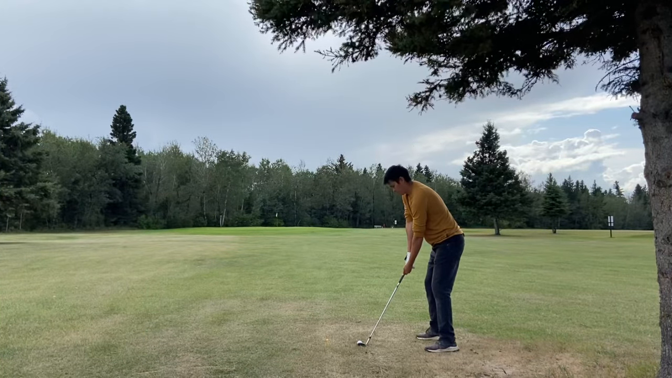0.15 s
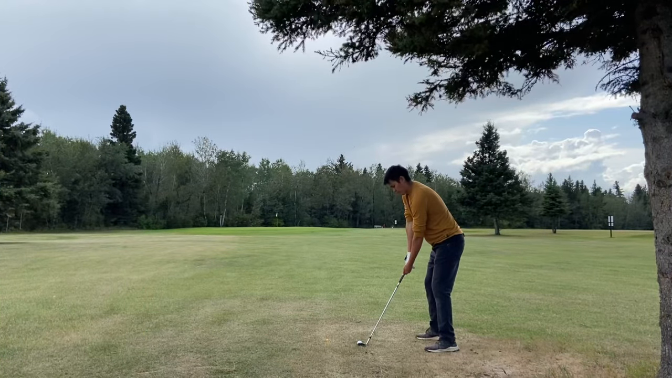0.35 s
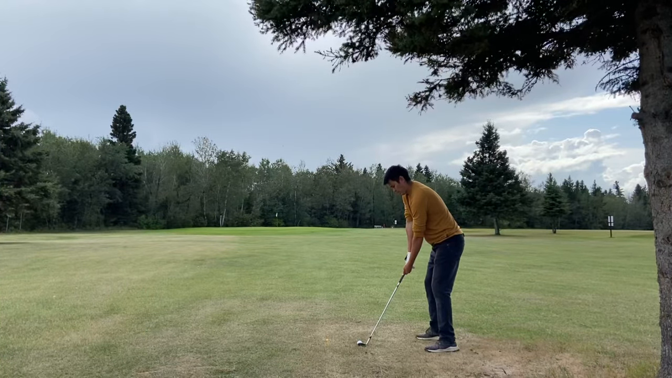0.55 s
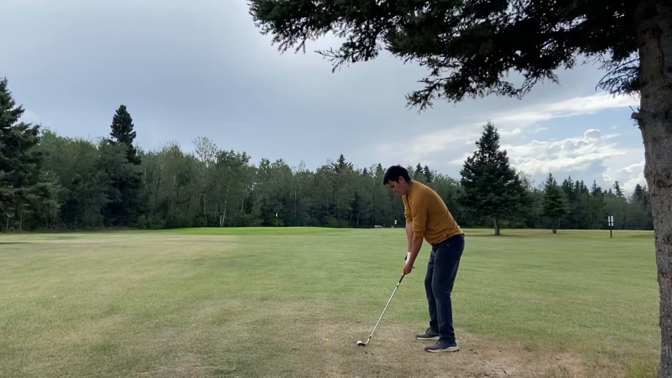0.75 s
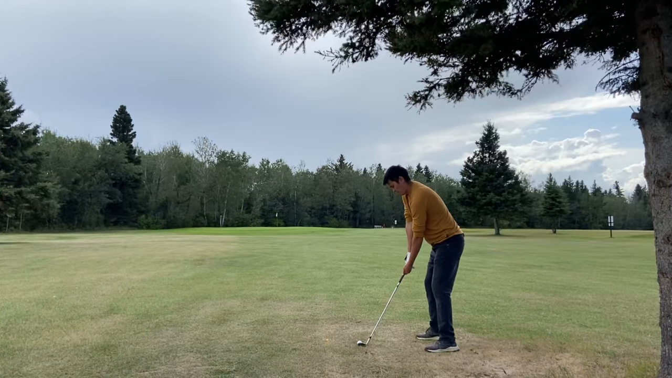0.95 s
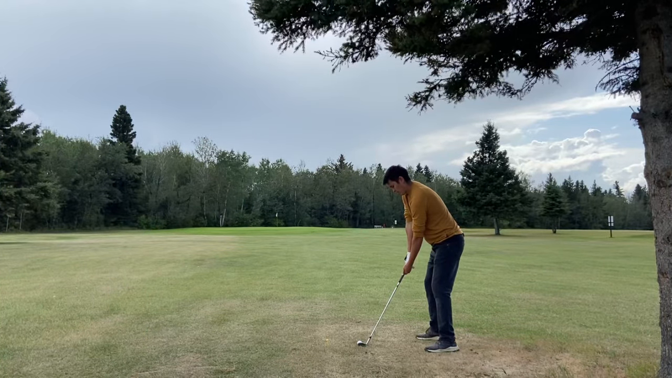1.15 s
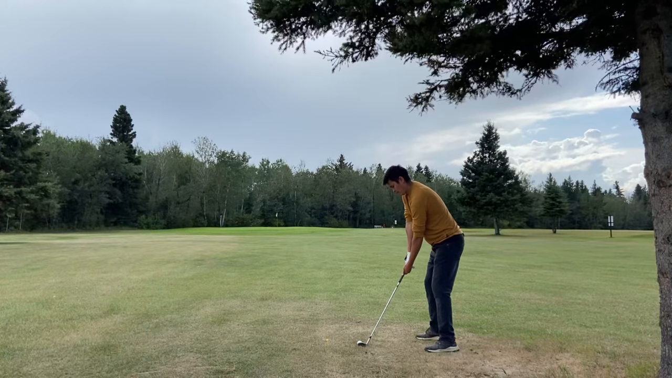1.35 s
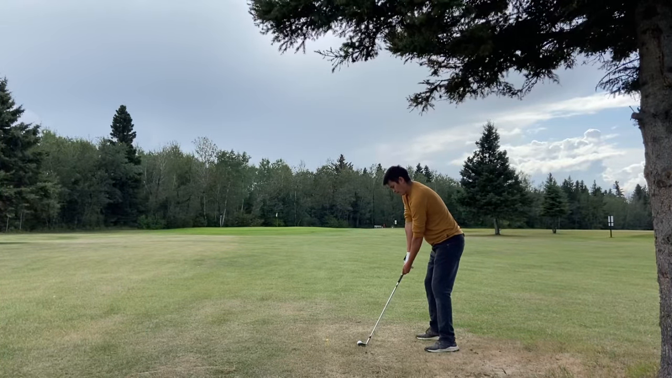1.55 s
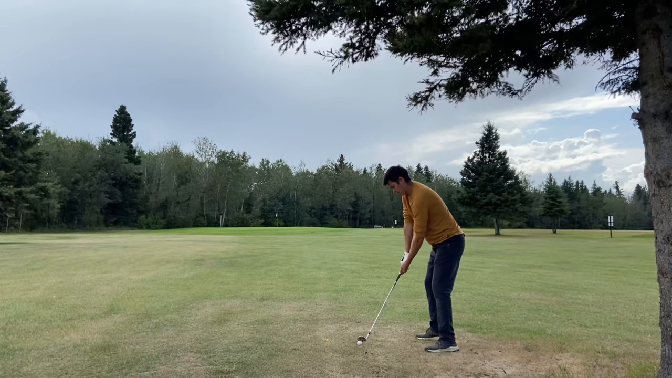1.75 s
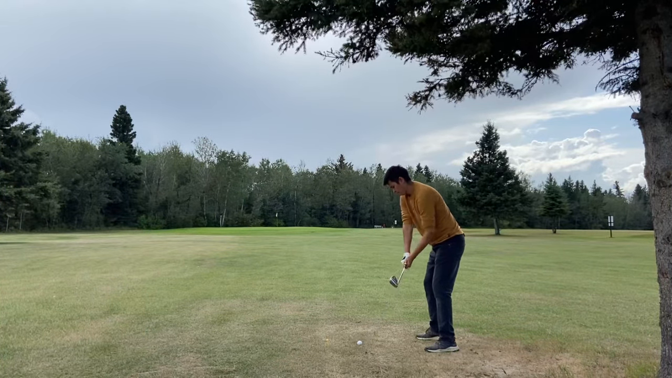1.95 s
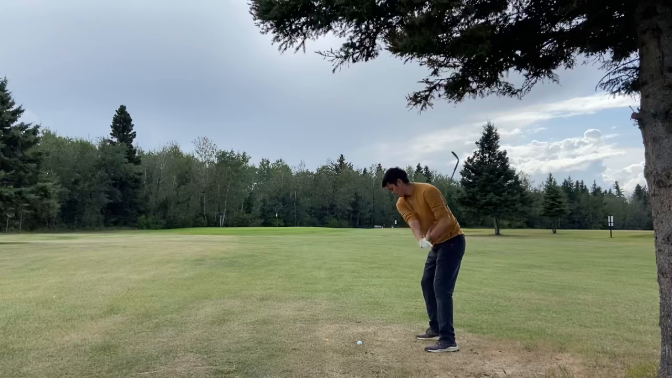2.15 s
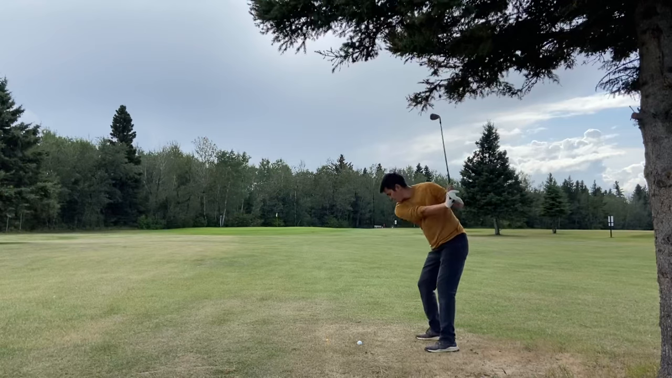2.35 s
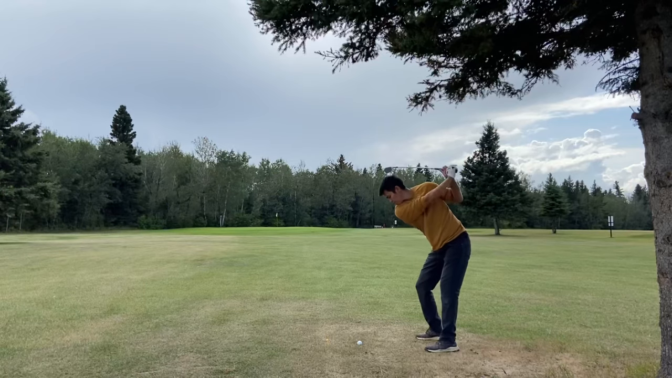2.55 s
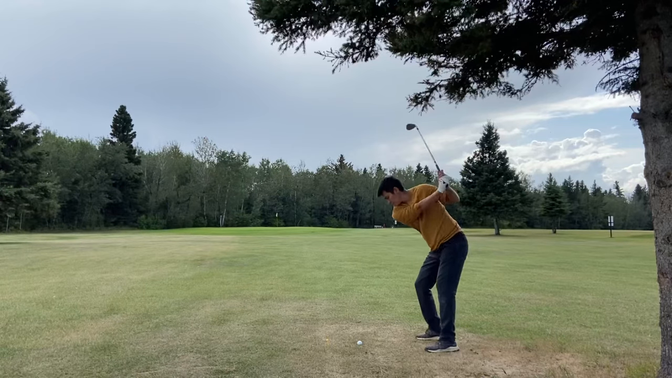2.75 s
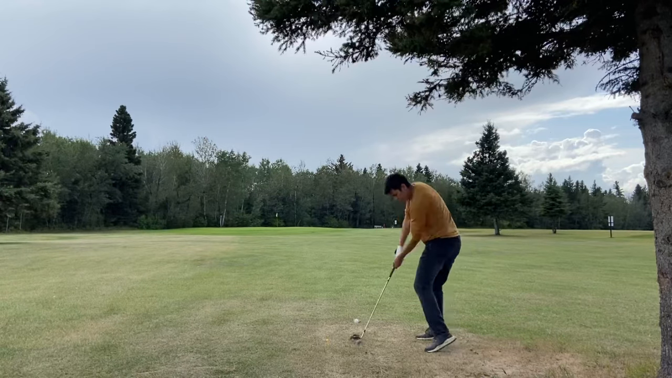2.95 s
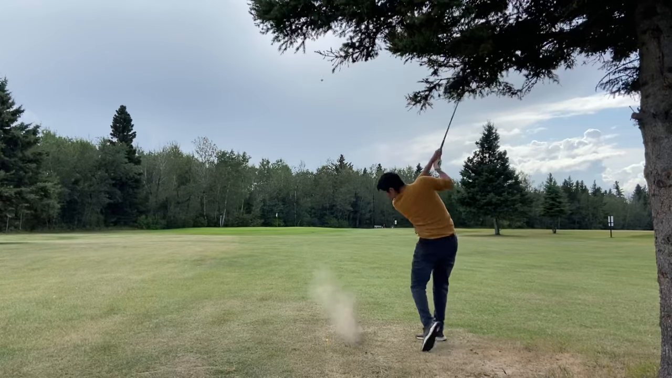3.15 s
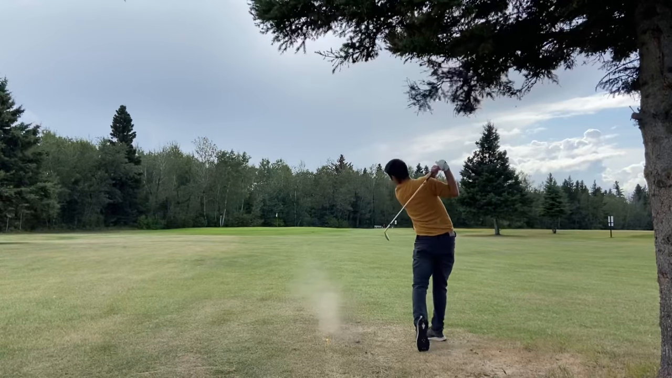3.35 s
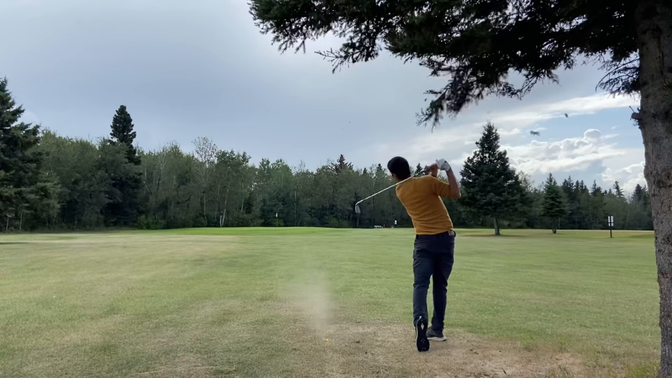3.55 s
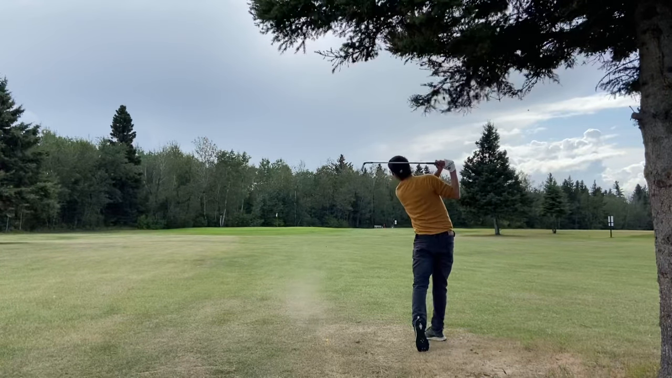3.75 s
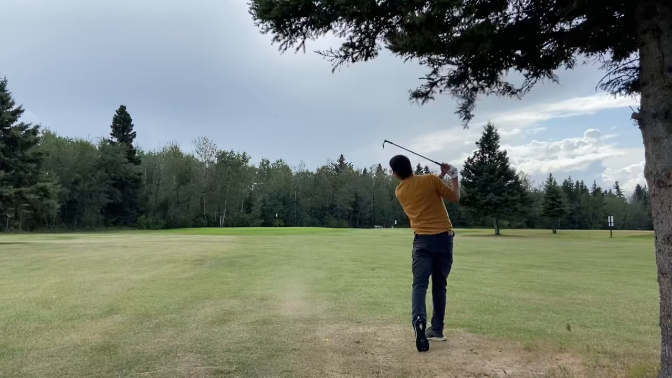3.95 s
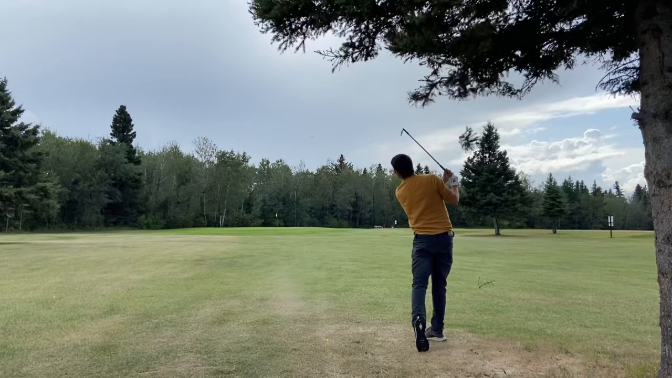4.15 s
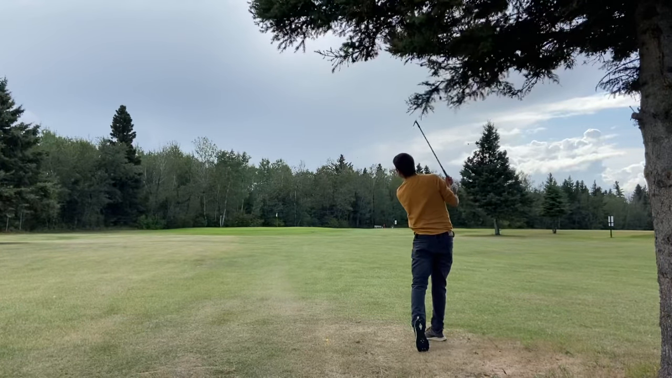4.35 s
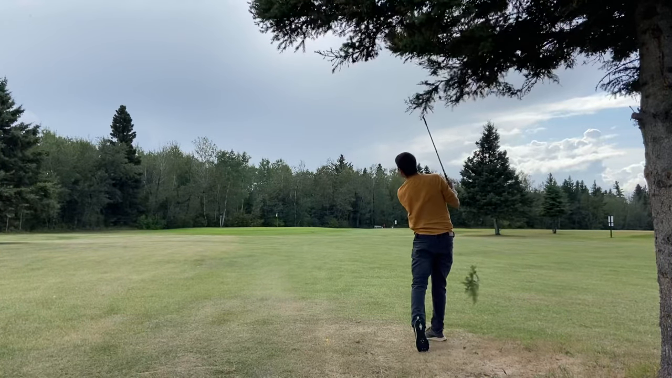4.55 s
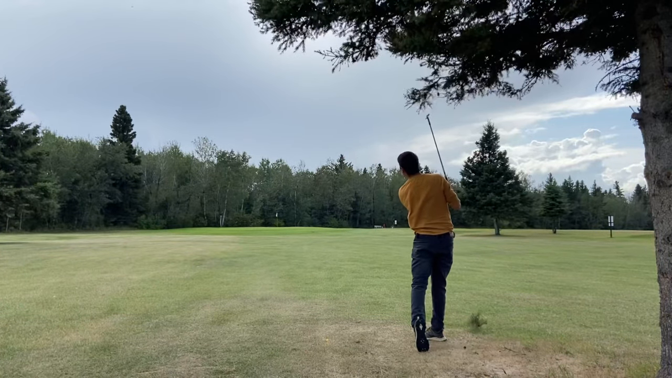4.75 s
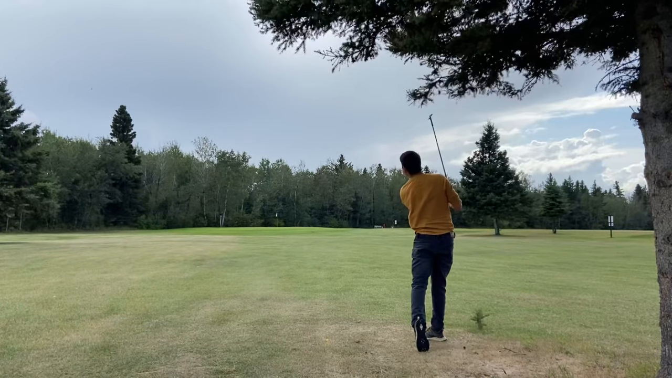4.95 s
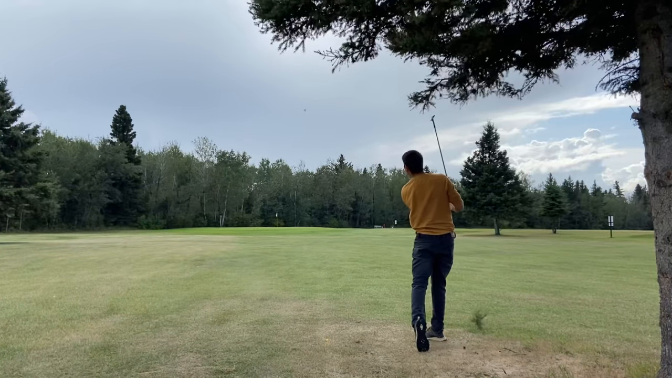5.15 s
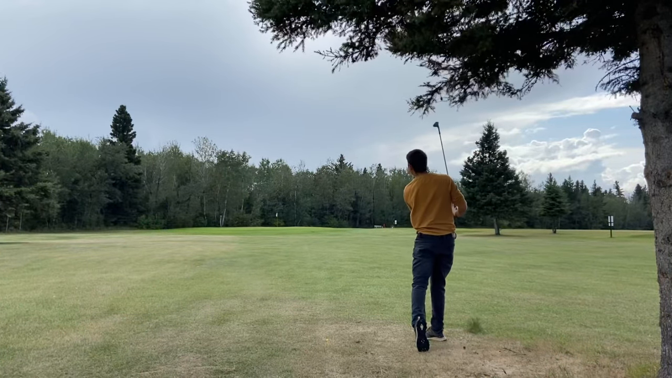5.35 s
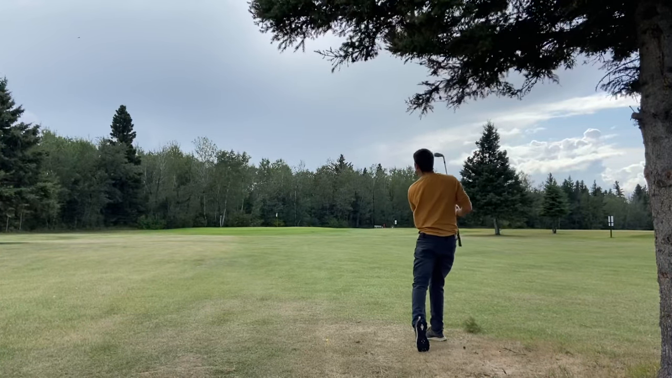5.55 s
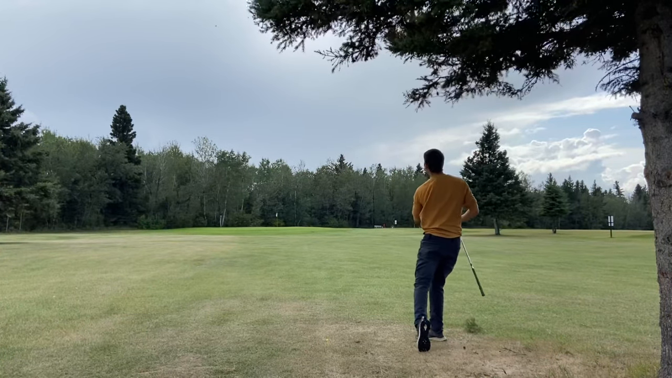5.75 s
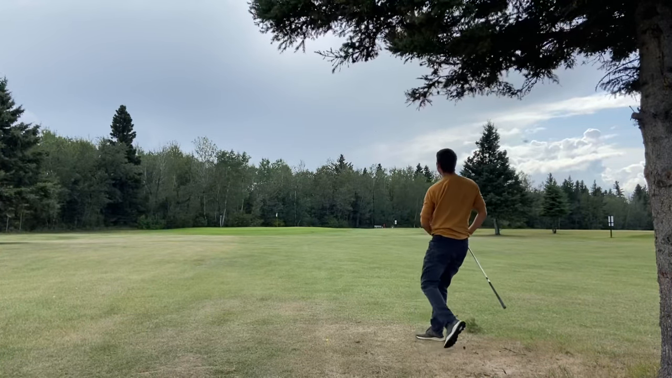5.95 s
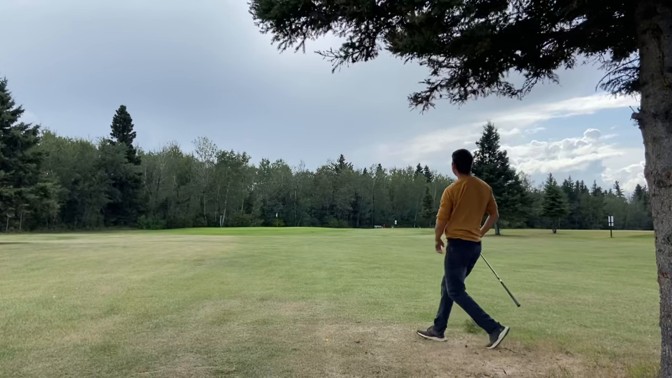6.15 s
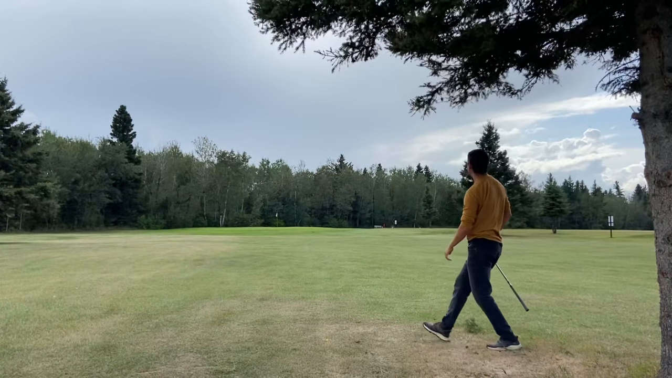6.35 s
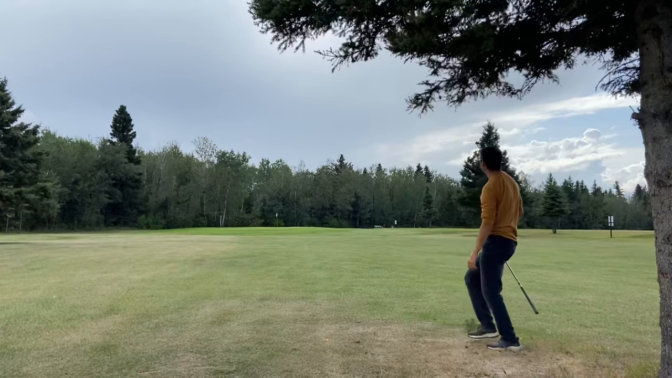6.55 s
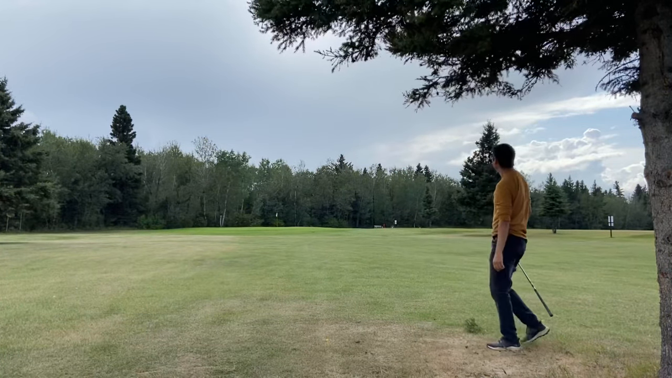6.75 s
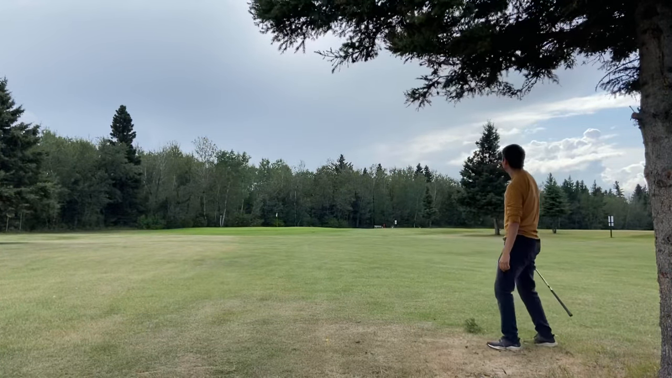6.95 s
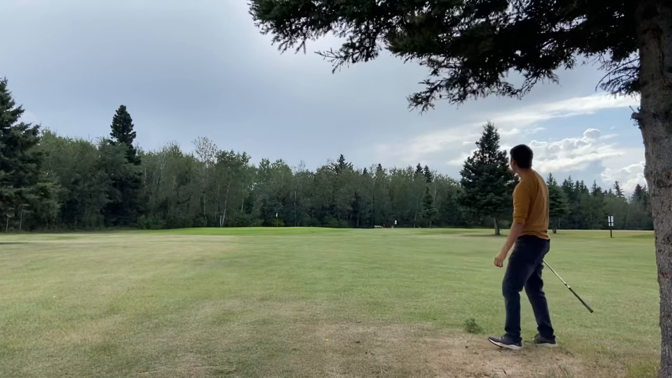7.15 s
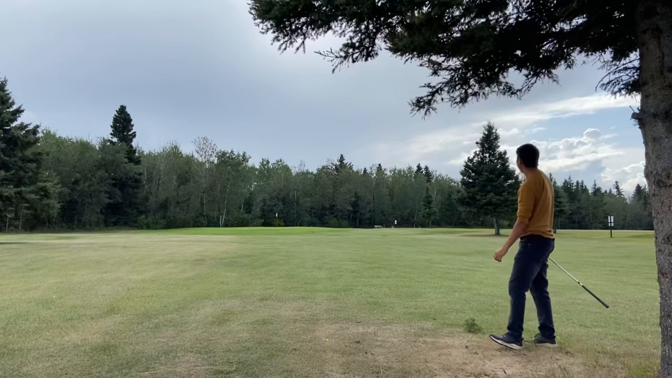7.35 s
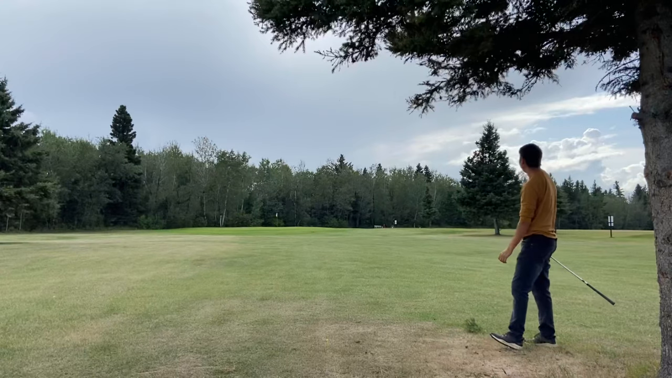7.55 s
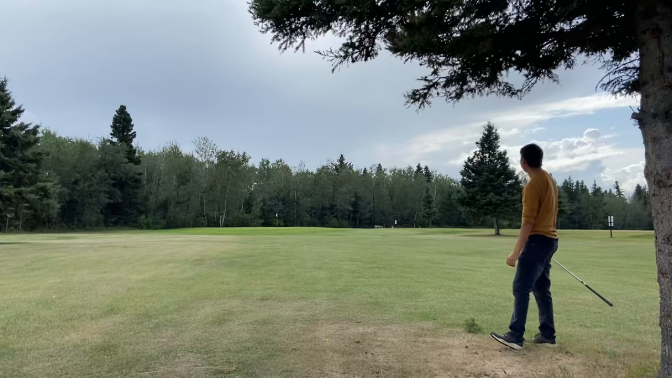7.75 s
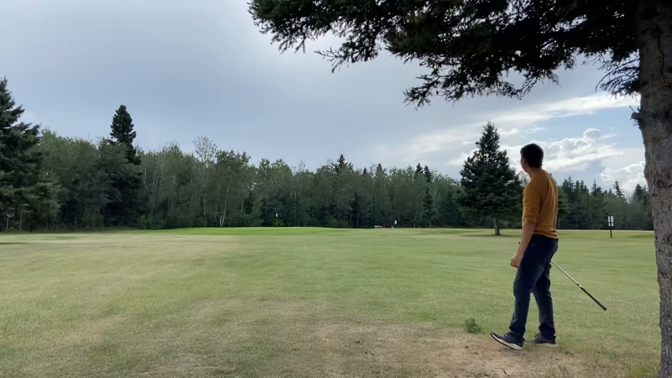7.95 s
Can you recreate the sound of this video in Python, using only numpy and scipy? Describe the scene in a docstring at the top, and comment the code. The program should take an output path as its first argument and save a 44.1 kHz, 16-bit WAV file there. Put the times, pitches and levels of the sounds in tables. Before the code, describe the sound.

Low uneven wind thumps a phone microphone outdoors; a golf swing whooshes into one sharp dry crack, then the ball snaps through conifer twigs.

```python
"""Golf swing on a breezy course

A golfer swings an iron: noise bands make the swish, and damped tones and crackles make the blow in dry turf.
The ball clips a spruce bough: ringing twigs, crunching noise and ticking needles. Puffs of noise are shoes and
club brushing the grass before the swing, and shoes, club and a falling twig afterwards. Shaped noise makes the
wind in the trees and on the two close ports of a phone microphone, where falling tones thump; a far machine hums."""
import sys
import numpy as np
from scipy import signal
from scipy.fft import rfft, irfft, next_fast_len
from scipy.io import wavfile
from scipy.ndimage import uniform_filter1d, map_coordinates

SR = 44100
rng = np.random.default_rng(int(sys.argv[2]) if len(sys.argv) > 2 else 0)


def transcribe(signal):
    """Save signal, clipped to [-1, 1], as a 16-bit WAV file at the path in sys.argv[1]."""
    frames = np.atleast_2d(signal).T
    limited = np.clip(frames, -1, 1)
    pcm = np.round(limited * 32767).astype(np.int16)
    wavfile.write(sys.argv[1], SR, pcm)


N = 353152  # samples, about 8 seconds

# In every noise colour table, level_db_per_hz is relative: the noise is scaled to rms 1 afterwards.
# In every table of bursts or ringing tones, level_db is taken before the rise, and t60_s is the time to fall 60 dB.

STRIKE_S = 2.9415  # the face meets the ball
RING_DB, CRACK_DB, CRACK_T60_S = -2, -4, 0.009
# Ringing tones of club face and ball: pitch_hz, level_db (before RING_DB), t60_s
CLUB_TONES = [(295, -15.5, 0.075), (476, -5, 0.035), (700, 2.5, 0.014), (1075, 0.5, 0.016),
              (1340, 0, 0.024), (1694, 3, 0.018), (2157, -5, 0.02), (2400, -18, 0.027), (2545, -11, 0.025),
              (2750, -7, 0.026), (3320, -18, 0.016), (3555, -4.5, 0.021), (3880, -15, 0.023),
              (4020, -21, 0.036), (4345, -8.5, 0.022), (4700, -13, 0.022), (5140, -15.5, .015),
              (5860, -10.5, 0.016), (6600, -11.5, 0.01), (6900, -10, .017), (7330, -14, 0.017),
              (8450, -19.5, 0.015), (10200, -17.5, 0.022), (14500, -19, .018)]
# Thuds of the club head into the ground: start_s, peak_db, pitch_hz
GROUND_THUDS = [(2.9415, -19, 160), (2.945, -15.5, 303), (2.9462, -21.5, 155), (2.948, -30.5, 75)]
# Noise colour of the crack: pitch_hz, level_db_per_hz
CRACK_COLOUR = [(300, -13), (1400, 7.5), (4000, -6.5), (9000, -9.5), (15500, -13)]
# Scrapes of the sole through the turf: start_s, level_db, t60_s
TURF_SCRAPES = [(2.939, -14, 0.022), (2.945, -19.5, 0.043), (2.953, -15.5, 0.039)]
# Noise colour of the turf: pitch_hz, level_db_per_hz
TURF_COLOUR = [(100, 2), (280, 11), (600, -11), (900, -7), (1400, 2.5), (1900, 2), (2700, 1), (3100, -6.5),
               (3950, -1), (4700, -3.5), (5600, -10), (6400, -5), (10000, -8.5), (15500, -17.5)]
# Sprays of dry soil off the face: start_s, level_db, t60_s
SOIL_SPRAYS = [(2.951, -35, 0.057), (2.9575, -32.5, 0.05), (2.966, -37.5, 0.05), (2.975, -41, .04)]
# Noise colour of the soil grains: pitch_hz, level_db_per_hz
SOIL_COLOUR = [(400, -5.5), (1400, -2), (2200, -4), (3100, -3.5), (4000, 8.5), (5400, -7), (6700, -6),
               (10000, -8), (15500, -14)]


def strike():
    """The sole grazes the grass, the face cracks and rings against the ball, then thuds and sprays dry soil."""
    blow = np.zeros(N)
    add(blow, STRIKE_S, amp(RING_DB) * ring(CLUB_TONES, rise_cycles=0.89))
    for start_s, peak_db, pitch_hz in GROUND_THUDS:
        add(blow, start_s, amp(peak_db) * push(pitch_hz, cycles=1.03))
    crack = bursts([(STRIKE_S, CRACK_DB, CRACK_T60_S)], rise_s=0.0001) * rush(CRACK_COLOUR)
    scrape = bursts(TURF_SCRAPES, rise_s=0.0021) * crackle(TURF_COLOUR, rate=2200, spread_db=4)
    spray = bursts(SOIL_SPRAYS, rise_s=0.0008) * crackle(SOIL_COLOUR, rate=1600, spread_db=3.5)
    return (blow + crack + scrape + spray) * amp([[0.2], [-0.2]])  # slightly left


def push(pitch_hz, cycles):
    """A soft pressure swing whose outline swells to 1 over some cycles, then dies away."""
    turns = pitch_hz * np.arange(SR // 4) / SR
    return swell(turns / cycles) * np.sin(2 * np.pi * turns)


# Speed of the shaft, given as the pitch of its vortices: time_s, pitch_hz
SHAFT_SPEED = [(2.6, 99.6), (2.82, 310), (2.872, 373), (2.895, 456), (2.918, 493), (2.94, 480), (3.0, 413),
               (3.075, 418), (3.2, 199), (3.35, 99.6)]
# Noise colour of the air torn by the club head: pitch_hz, level_db_per_hz
AIR_COLOUR = [(200, -1.5), (700, 6), (1300, -0.5), (2300, 0), (5000, -10.5), (9000, -16), (15000, -22)]
WHISTLE_DB, WHISTLE_GROWS = -39.5, 5  # level at top speed; power of speed
AIR_DB, AIR_GROWS = -41, 6.8  # level at top speed; power of speed
WHISTLE_WIDTH_HZ = 90  # random knots a second: more of them scatter the pitch more widely
FOLLOW_THROUGH_DB = -5.5  # the whistle drops once the club is past the ball


def swish():
    """The shaft sheds ragged vortices, a narrow noise band, and the head tears the air; both grow with speed."""
    pitch_hz, = curves(SHAFT_SPEED)
    speed_db = 20 * np.log10(pitch_hz / pitch_hz.max())
    past_ball = np.arange(N) / SR > STRIKE_S
    phase = 2 * np.pi * np.cumsum(pitch_hz) / SR
    # two random curves make the tone waver in strength and phase
    sine_part = wobble(WHISTLE_WIDTH_HZ) * np.sin(phase)
    cosine_part = wobble(WHISTLE_WIDTH_HZ) * np.cos(phase)
    vortices = unit(sine_part + cosine_part)
    whistle = amp(WHISTLE_DB + WHISTLE_GROWS * speed_db) * vortices
    air = amp(AIR_DB + AIR_GROWS * speed_db) * rush(AIR_COLOUR)
    return whistle * amp(FOLLOW_THROUGH_DB * past_ball) + air


# Snaps as the ball breaks through the bough; knock and crunch are relative to the snap:
# start_s, level_db, t60_s, knock_db, crunch_db, pitch_ratio
TWIG_SNAPS = [(3.1159, -19.5, 0.011, -8.5, -14, 1.35), (3.1178, -16.5, 0.017, -1, -9, 1),
              (3.1202, -21, 0.02, -3, -9, 1.4), (3.128, -33, 0.028, -11, -9, .8),
              (3.132, -32, 0.028, -16, -7, 1.55), (3.1355, -42, 0.022, -16, 7, 2),
              (3.142, -41, 0.039, -16, -6, 1.8), (3.159, -39.5, 0.055, -16, -6, 1.7),
              (3.166, -38, 0.083, -17, -6, 1.6), (3.172, -40, 0.056, -17, -2, 2.1),
              (3.189, -39, 0.065, -18, -8, 2.3), (3.324, -46.5, 0.098, -17, -14, 2)]
# Ringing tones of the wood at pitch_ratio 1: pitch_hz, level_db (relative), t60_s
WOOD_TONES = [(150, -15.5, 0.097), (307, -13.5, 0.063), (683, -9.5, 0.04), (940, -8, 0.039),
              (1187, -4, 0.051), (1570, -4, 0.029), (2460, -11, 0.033), (2850, -16, .028),
              (3440, -17, .023), (3910, -15, 0.022), (4760, -17, 0.025), (4930, -12, .027)]
# Noise colour of splinters and needles: pitch_hz, level_db_per_hz
SPLINTER_COLOUR = [(300, -11), (800, -6), (1400, -9), (2600, -2.5), (4800, -2.5), (6000, -4.5), (9000, 4.5),
                   (12000, 0.5), (15000, 2), (16000, -11.5)]
# Noise colour of crushed twigs: pitch_hz, level_db_per_hz
TWIG_COLOUR = [(200, -12), (700, 0), (1250, -1), (2000, -2), (2600, -5), (4900, -4), (6000, -15),
               (15000, -32)]
SWEEP_DB, SWEEP_T60_S = -40, 0.38  # sprigs that whip against each other


def bough():
    """The ball knocks on the wood, then crushes and splinters twigs, each knock with its own pitch."""
    knocks = np.zeros(N)
    for start_s, level_db, _, knock_db, _, ratio in TWIG_SNAPS:
        # higher twigs also ring for a shorter time
        twig = [(hz * ratio, tone_db, t60_s / ratio) for hz, tone_db, t60_s in WOOD_TONES]
        add(knocks, start_s, amp(level_db + knock_db) * ring(twig, rise_cycles=0.4))
    splinters = bursts([row[:3] for row in TWIG_SNAPS], rise_s=0.00013) * rush(SPLINTER_COLOUR)
    crunch_rows = [(s, db + crunch_db, t60_s) for s, db, t60_s, _, crunch_db, _ in TWIG_SNAPS]
    crunch = bursts(crunch_rows, rise_s=0.00017) * crackle(TWIG_COLOUR, rate=2500, spread_db=2.5)
    sprigs = unit(amp(2.5 * wobble(220)) * crackle(TWIG_COLOUR, rate=1200, spread_db=3.5))
    sweep = bursts([(TWIG_SNAPS[0][0], SWEEP_DB, SWEEP_T60_S)], rise_s=0.0054) * sprigs
    return (knocks + crunch + sweep) * amp([[-0.3], [0.3]]) + splinters  # all but splinters slightly right


SHOWER_DB, SHOWER_T60_S = -34.5, 0.6  # needles shaken loose
TRICKLE_DB, TRICKLE_HOLD_S, TRICKLE_T60_S = -65, 0.83, 0.72  # the last ones sift down


def needles():
    """The first snap shakes out a clumpy shower of needles that thins to a trickle, holds and dies away."""
    start_s = TWIG_SNAPS[0][0]
    age_s = np.arange(N) / SR - start_s
    shower = bursts([(start_s, SHOWER_DB, SHOWER_T60_S)], rise_s=0.0028)
    after_hold_s = np.maximum(age_s - TRICKLE_HOLD_S, 0)
    trickle = (age_s > 0) * amp(TRICKLE_DB - 60 * after_hold_s / TRICKLE_T60_S)
    ticks = crackle(SPLINTER_COLOUR, rate=1500, spread_db=6) * amp(1.5 * wobble(150))
    return np.hypot(shower, trickle) * ticks


# Small brushes in the grass, of shoes and club before the swing and of shoes, club and falling twig afterwards:
# start_s, level_db, t60_s, rise_s
GRASS_BRUSHES = [(.88, -63, 0.25, .015), (1.65, -60, 0.043, .0014), (2.23, -55, 0.23, 0.057),
                 (4.002, -59, .06, .0014), (4.249, -51, .03, .0014), (4.256, -45.5, 0.039, 0.0008),
                 (4.265, -61, .5, .02), (4.624, -52, 0.39, 0.0083), (5.979, -52, 0.063, .0014),
                 (5.99, -61.5, 0.7, .0014), (6.73, -63, 0.44, .03)]
# Noise colour of the grass: pitch_hz, level_db_per_hz
GRASS_COLOUR = [(1500, -10), (5000, -6), (7200, 0), (12000, 0.5), (15000, -2), (16000, -5)]


def grass():
    """Each brush is a puff of dry noise, roughened by fast random level changes, sudden or swelling."""
    level = sum(bursts([(s, db, t60_s)], rise_s) for s, db, t60_s, rise_s in GRASS_BRUSHES)
    return level * unit(amp(3.2 * wobble(770)) * rush(GRASS_COLOUR))


# Rustles of clothes as the golfer settles and takes the club back: peak_s, peak_db
CLOTH_RUSTLES = [(.12, -60.5), (1.76, -56.5)]
# Noise colour of the cloth: pitch_hz, level_db_per_hz
CLOTH_COLOUR = [(500, 9), (2500, 0), (5000, -12), (7500, -12), (10000, -22), (15000, -30)]
RUSTLE_S = 0.09  # time from the peak until the level is down to 37 percent


def clothes():
    """Each rustle is cloth noise that swells and fades smoothly."""
    t = np.arange(N) / SR
    level = sum(amp(db) * np.exp(-((t - peak_s) / RUSTLE_S) ** 2) for peak_s, db in CLOTH_RUSTLES)
    return level * rush(CLOTH_COLOUR)


# Wind buffeting the microphone: time_s, level_db (before RUMBLE_DB and the lumps)
BUFFET_LEVEL = [(0.0, -40.5), (0.12, -36.5), (0.27, -41.5), (0.62, -43.5), (0.85, -44.5), (0.96, -50),
                (1.12, -44.5), (1.27, -49.5), (1.45, -39.5), (1.52, -36), (1.61, -45), (1.75, -50),
                (1.96, -46.5), (2.08, -42.5), (2.2, -40), (2.34, -35.5), (2.48, -40.5), (2.55, -51),
                (2.7, -48.5), (2.92, -51), (3.12, -39), (3.23, -39.5), (3.34, -43.5), (3.45, -42.5),
                (3.56, -41.5), (3.8, -40.5), (3.92, -45), (4.05, -43), (4.18, -39.5), (4.34, -42.5),
                (4.53, -43.5), (4.95, -42.5), (5.14, -43), (5.55, -39.5), (5.71, -45.5), (5.93, -47),
                (6.02, -43), (6.38, -39), (6.56, -37.5), (6.69, -33.5), (6.82, -41.5), (7.1, -43),
                (7.42, -47.5), (7.66, -45), (7.9, -40.5), (8.01, -38)]
# Noise colour of the rumble: pitch_hz, level_db_per_hz
RUMBLE_COLOUR = [(20, -27.5), (35, -6), (55, 3.5), (85, 1), (130, -4.5), (200, -10.5), (300, -14),
                 (450, -34), (700, -37.5), (1500, -91)]
# Strongest eddies that hit the microphone; pitch is taken at the peak, flutter is relative to peak_db:
# peak_s, peak_db, pitch_hz, flutter_db, flutter_t60_s
WIND_EDDIES = [(.041, -26.5, 149, -2.5, 0.085), (.087, -24.5, 130, -9, 0.097),
               (0.239, -29.5, 170, -6.5, 0.22), (.294, -31, 153, -3, 0.073), (0.415, -32, 112, -8, 0.087),
               (0.437, -27, 163, -20, 0.083), (.558, -23, 153, -11, 0.16), (.735, -35, 159, -11, 0.11),
               (1.328, -28.5, 89.5, -8.5, 0.14), (1.471, -32, 150, -6, 0.12),
               (1.504, -17, 98, -12.5, 0.078), (1.679, -28.5, 89, -14, .08),
               (2.263, -25.5, 151, -14, 0.083), (2.348, -25, 240, -10, .1), (2.361, -19, 161, -5, 0.12),
               (2.441, -46, 120, -13, .09), (2.615, -29.5, 110, -5.5, 0.29), (2.696, -23, 182, 0, 0.072),
               (3.014, -23, 70, -7, 0.094), (3.193, -25.5, 166, -5.5, 0.18), (3.235, -26, 129, -19, .1),
               (4.127, -37, 89, -12, 0.067), (4.218, -17.5, 128, -13, 0.084), (4.237, -18, 112, -12.5, 0.1),
               (4.43, -29, 85, -14, .08), (4.525, -26.5, 100, -17, .09), (4.559, -30.5, 189, 2, .06),
               (4.866, -28.5, 107, -7, 0.11), (4.9, -22, 80, -6, 0.14), (5.364, -33.5, 480, -11, 0.063),
               (5.393, -26, 257, 1, 0.078), (5.41, -15, 138, -18.5, 0.056), (5.451, -32.5, 450, -5, 0.092),
               (5.486, -35, 420, -2, 0.087), (5.5, -30.5, 123, -10, .08), (5.532, -21, 85.5, -20, .1),
               (5.611, -26, 104, -9, .13), (5.625, -27, 140, -13, .12), (5.781, -30, 83.5, -14, 0.081),
               (5.85, -30, 95, -13, .08), (6.479, -28.5, 100, -14, 0.092), (6.56, -20.5, 101, -18, .1),
               (6.652, -7, 79, -23, 0.17), (6.69, -26, 198, -1, 0.29), (6.714, -27, 170, -10, 0.12),
               (6.894, -27.5, 129, -12, 0.11), (7.263, -21, 89, -6.5, 0.11)]
# Noise colour of the flutter: pitch_hz, level_db_per_hz
FLUTTER_COLOUR = [(40, -20), (110, -1.5), (200, 0), (290, -5), (450, -17.5), (900, -56), (2500, -74)]
RUMBLE_DB = 3.5  # rumble over the buffet level
LUMP_DB, PORT_LUMP_DB = 1.34, 1.1  # size of the lumps at both ports together and at each alone
EDDY_LAG_CYCLES = 0.086  # an eddy's delay from port to port


def microphone_wind():
    """A lumpy rumble, with eddies that thump, slow down and flutter, each thump reaching one port first."""
    buffet_db, = curves(BUFFET_LEVEL)
    lumps_db = LUMP_DB * wobble(22) + PORT_LUMP_DB * np.array([wobble(30), wobble(30)])
    rumble = amp(buffet_db + RUMBLE_DB + lumps_db) * rush(RUMBLE_COLOUR)
    thumps, flutter = np.zeros((2, N)), np.zeros(N)
    lags = EDDY_LAG_CYCLES * rng.choice([-1, 1], len(WIND_EDDIES))  # random side first
    for (peak_s, peak_db, pitch_hz, flutter_db, t60_s), lag in zip(WIND_EDDIES, lags):
        start_s = peak_s - EDDY_CYCLES / pitch_hz
        half_lag_s = lag / pitch_hz / 2
        thump = amp(peak_db) * eddy(pitch_hz)
        add(thumps[0], start_s - half_lag_s, thump)
        add(thumps[1], start_s + half_lag_s, thump)
        add(flutter, start_s, amp(peak_db + flutter_db) * fade(t60_s, rise_s=0.0016))
    return (rumble + thumps + flutter * rush(FLUTTER_COLOUR)) * amp([[0.3], [-0.3]])


EDDY_CYCLES = 1.12  # cycles of the peak pitch from start to peak
EDDY_TYPICAL_HZ, EDDY_FALL_OCTAVES = 150, 0.75  # an eddy of this pitch sinks this far on the way to its peak


def eddy(pitch_hz):
    """A pressure swirl that sinks in pitch as it passes; small, high ones sink furthest."""
    u = pitch_hz * np.arange(SR // 4) / SR / EDDY_CYCLES  # 1 at the peak
    fall_octaves = EDDY_FALL_OCTAVES * np.sqrt(pitch_hz / EDDY_TYPICAL_HZ)
    falling_hz = pitch_hz * 2 ** (fall_octaves * (1 - u))
    return swell(u) * np.sin(2 * np.pi * np.cumsum(falling_hz) / SR)


# Wind in the trees, in two groups of rows: time_s, roar_db (before ROAR_DB), leaves_db (before LEAVES_DB)
TREE_LEVELS = [
    [(0.0, -61, -59.5), (0.68, -61.5, -62), (1.51, -57, -61), (1.85, -57.5, -59.5), (2.8, -55, -60.5)],
    [(3.5, -53.5, -56.5), (4.38, -52, -55), (5.91, -52, -52), (6.93, -48.5, -52.5), (8.01, -50.5, -51.5)],
]
# Noise colour of the low roar: pitch_hz, level_db_per_hz
ROAR_COLOUR = [(100, -26.5), (300, 1), (550, -1.5), (780, -1.5), (1020, -1.5), (1500, -9.5), (2300, -18),
               (4000, -40), (8000, -65)]
# Noise colour of the leaves: pitch_hz, level_db_per_hz
LEAVES_COLOUR = [(600, -12.5), (1400, 2.5), (2200, 0), (3200, -4.5), (4600, -9), (6000, -20), (9000, -38.5),
                 (15000, -49.5)]
# Noise colour of the needles' hiss: pitch_hz, level_db_per_hz
HISS_COLOUR = [(1500, -20), (4000, 2.5), (5800, 1.5), (7000, 3), (8500, -2.5), (10000, -10.5),
               (11500, -22.5), (13000, -35), (15500, -39)]
# Finest hiss as the breeze freshens: time_s, level_db
FIZZ_LEVELS = [(5.5, -92), (6.2, -79), (7.1, -76), (7.5, -69.5), (8.01, -69)]
# Noise colour of the finest hiss: pitch_hz, level_db_per_hz
FIZZ_COLOUR = [(6000, -21), (9500, 4), (11000, -1.5), (12500, -17), (15500, -27)]
ROAR_DB, LEAVES_DB = 4, 1  # each layer over its level curve
HISS_DB, HISS_GROWS = -73.5, 3.27  # needle hiss in the average breeze; dB gained per dB of the leaves


def trees():
    """The breeze builds in the forest, mostly left; the needles' hiss grows faster than the leaves' rustle."""
    roar_db, leaves_db = curves(np.vstack(TREE_LEVELS))
    hiss_db = HISS_DB + HISS_GROWS * (leaves_db - leaves_db.mean())
    gust_db = 0.17 * wobble(1.7)
    roar = amp(roar_db + ROAR_DB + gust_db) * patchy(rush(ROAR_COLOUR), depth_db=1.55)
    leaves = amp(leaves_db + LEAVES_DB + gust_db) * patchy(rush(LEAVES_COLOUR), depth_db=1.95)
    hiss = amp(hiss_db + gust_db) * patchy(rush(HISS_COLOUR), depth_db=1.2)
    fizz_db, = curves(FIZZ_LEVELS)
    fizz = amp(fizz_db) * rush(FIZZ_COLOUR)
    return roar * amp([[0.5], [-0.5]]) + leaves * amp([[1.2], [-1.2]]) + hiss + fizz


# Hum of a far machine: time_s, level_db (before its wavering)
HUM_LEVEL = [(1.4, -76), (1.7, -53.5), (2.3, -54), (2.8, -58), (4, -63.5), (8, -55.5)]
# Narrow band of far hiss: time_s, level_db
BAND_LEVELS = [(0.0, -60), (0.6, -64.5), (1.4, -67.5), (2.8, -65.5), (4, -82.5)]
# Noise colour of the narrow band: pitch_hz, level_db_per_hz
BAND_COLOUR = [(1400, -25.5), (1900, 1.5), (2350, 0), (2800, -3.5), (3500, -26), (7000, -45.5)]
# Noise colour of the steady hiss: pitch_hz, level_db_per_hz
STILL_COLOUR = [(1500, -9.5), (5000, -3), (9000, 2.5), (13000, -3), (15500, -16)]
HUM_HZ, STILL_DB = 280, -79  # middle pitch of the hum; level of the steady hiss


def background():
    """A faint far hum, wavering in level and pitch, a narrow band of hiss that fades, and a thin steady hiss."""
    hum_db, = curves(HUM_LEVEL)
    band_db, = curves(BAND_LEVELS)
    hum_phase = 2 * np.pi * np.cumsum(HUM_HZ + 4 * wobble(18)) / SR
    hum = amp(hum_db + 2.6 * wobble(13)) * np.sin(hum_phase)
    return hum + amp(band_db) * rush(BAND_COLOUR) + amp(STILL_DB) * rush(STILL_COLOUR)


# Likeness of the noise at the two ports: pitch_hz, likeness (no unit, 1 = identical)
PORT_LIKENESS = [(60, 0.89), (250, 0.54), (600, 0.19), (1400, 0.27), (2500, 0.73), (5800, 0.67), (7000, 1)]


def rush(colour_rows):
    """Coloured stereo noise of rms 1, partly alike at the two ports."""
    def mid_and_side(hz):
        angle = np.arccos(np.clip(along(PORT_LIKENESS, hz), -1, 1)) / 2
        return amp(along(colour_rows, hz)) * [np.cos(angle), np.sin(angle)]

    mid, side = filtered(rng.standard_normal((2, N)), mid_and_side)
    return unit(np.array([mid + side, mid - side]))


def crackle(colour_rows, rate, spread_db):
    """Tiny ticks of uneven size, rate a second, on an equal bed of noise; rms 1."""
    happens = rng.random(N) < rate / SR
    size_db = spread_db * np.minimum(rng.exponential(size=N), 3)
    ticks = happens * rng.choice([-1, 1], N) * amp(size_db)
    grains = filtered(ticks, lambda hz: amp(along(colour_rows, hz)))
    return unit(unit(grains) + rush(colour_rows))


def patchy(x, depth_db):
    """Drifting patches of gain over time and frequency; rms 1."""
    z = signal.stft(x, nperseg=1024)[2]
    field = rng.standard_normal(z.shape[1:])  # the same for both sides
    field = uniform_filter1d(field, size=3, axis=0)  # smooth over frequency
    field = uniform_filter1d(field, size=6, axis=1)  # smooth over time
    return unit(signal.istft(z * amp(depth_db * unit(field)), nperseg=1024)[1][:, :N])


def ring(tones, rise_cycles):
    """Damped tones of alternating sign; the low ones take longer to build."""
    t = np.arange(SR // 2) / SR
    total = np.zeros(len(t))
    for k, (hz, db, t60_s) in enumerate(tones):
        total += (-1) ** k * amp(db) * fade(t60_s, rise_cycles / hz) * np.sin(2 * np.pi * hz * t)
    return total


def swell(u):
    """A smooth outline that reaches 1 at u = 1 and then dies away."""
    return (u * np.exp(1 - u)) ** 4


def fade(t60_s, rise_s):
    """Half a second of envelope: a quick rise, then a steady decay."""
    t = np.arange(SR // 2) / SR
    return np.exp(-np.log(1000) * t / t60_s) * (1 - np.exp(-t / rise_s))


def bursts(rows, rise_s):
    """Envelope of bursts given as start_s, level_db, t60_s."""
    level = np.zeros(N)
    for start_s, db, t60_s in rows:
        add(level, start_s, amp(db) * fade(t60_s, rise_s))
    return level


def add(track, start_s, sound):
    """Mix a sound into a track from a start time."""
    part = track[..., round(start_s * SR):][..., :sound.shape[-1]]
    part += sound[..., :part.shape[-1]]


def wobble(rate):
    """A smooth random curve, rate knots a second."""
    knots = rng.standard_normal(int(N * rate / SR) + 4)
    return map_coordinates(knots, [np.arange(N) * rate / SR])


def curves(rows):
    """One value per sample for each column after the time."""
    s, *columns = np.transpose(rows)
    return [np.interp(np.arange(N) / SR, s, column) for column in columns]


def along(points, hz):
    """Read (pitch_hz, value) points on a log pitch axis."""
    f, v = np.transpose(points)
    return np.interp(np.log(hz + 1), np.log(f + 1), v)


def filtered(x, response):
    """Filter x by a response given as a function of frequency."""
    m = next_fast_len(N + SR // 2)
    return irfft(rfft(x, m) * response(np.fft.rfftfreq(m, 1 / SR)), m)[..., :N]


def amp(db):
    """Decibels to gain."""
    return 10 ** (np.asarray(db) / 20)


def unit(x):
    """Scale to rms 1."""
    return x / np.sqrt(np.mean(x ** 2) + 1e-20)


def scene():
    """Everything in the open air."""
    golfer = strike() + swish() + bough() + needles() + grass() + clothes()
    return golfer + microphone_wind() + trees() + background()


TOP_HZ = 15850  # the treble ends here


def record(dry):
    """The port spacing makes the left side lead in the treble; peaks beyond full scale are clipped."""
    def port_lead(hz):
        lead = np.pi * np.maximum(hz - 6950, 0) / 4150  # radians, forward on the left and back on the right
        return np.exp(1j * lead * [[1], [-1]])

    low_cut = signal.butter(2, 32, "high", fs=SR, output="sos")
    pair = filtered(signal.sosfilt(low_cut, dry), port_lead)
    clipped = np.clip(pair, -1, 1)
    return signal.sosfilt(signal.butter(14, TOP_HZ, fs=SR, output="sos"), clipped)


dry = scene()
out = record(dry)
transcribe(out)
```